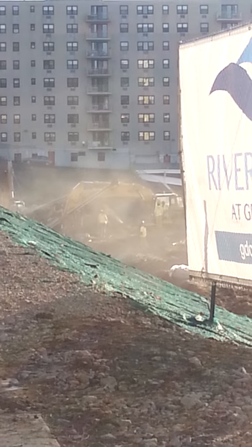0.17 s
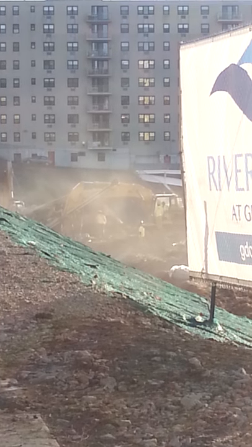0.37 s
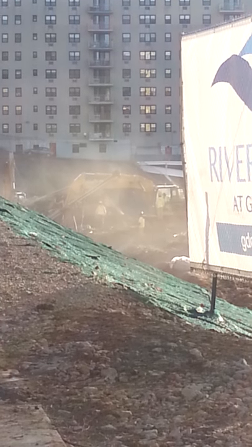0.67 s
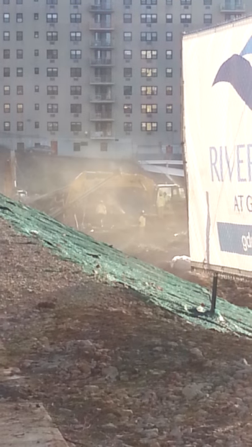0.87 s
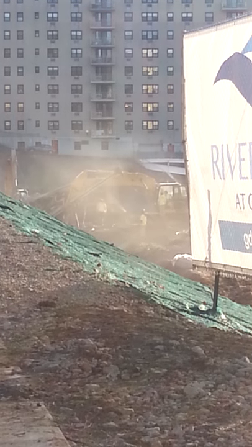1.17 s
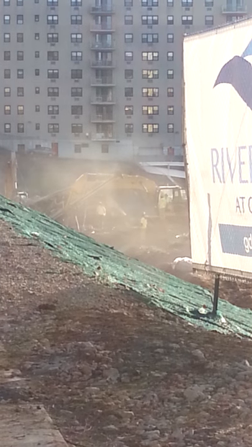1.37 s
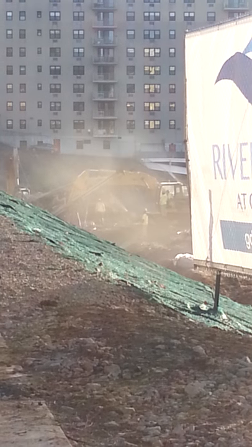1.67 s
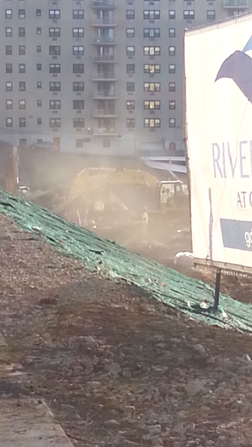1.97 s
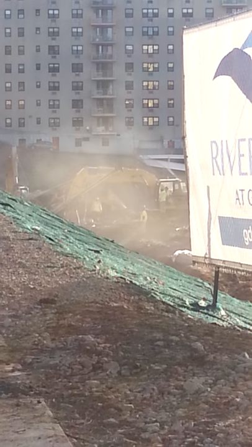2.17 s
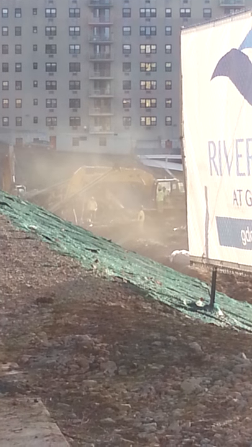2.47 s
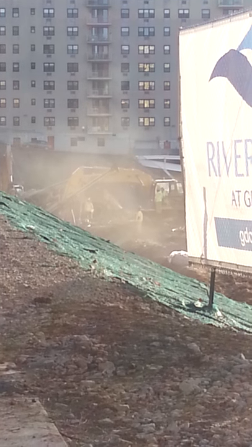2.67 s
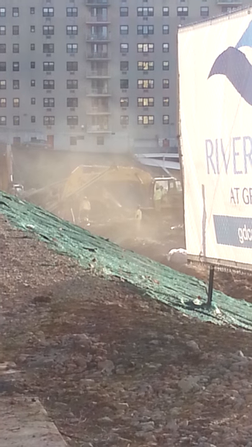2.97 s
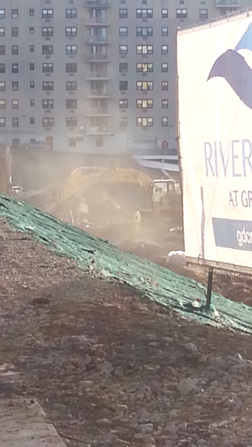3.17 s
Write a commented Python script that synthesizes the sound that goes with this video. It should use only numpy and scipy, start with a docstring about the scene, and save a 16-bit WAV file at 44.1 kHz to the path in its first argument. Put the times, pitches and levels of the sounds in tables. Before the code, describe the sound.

Steady engine drone and broad far roar on an open building site; a tiny tick and grit puff precede a clattering metallic burst with booming echo, then machinery continues with a brief steel squeal, miked from afar.

```python
"""A steel attachment hammers a short, slowing burst that booms back off a tall facade on a building site,
heard from across open ground. Each contact rings steel modes, scrapes up grit noise and thuds; a puff of grit
and a bright tick come first. Hydraulic pumps whine and steel squeals briefly, as drifting sines. Diesel engines
drone as wavering multiples of their shaft rates, over a broad far roar of coloured noise and microphone hiss."""
import sys
import numpy as np
from scipy import signal
from scipy.fft import rfft, irfft, next_fast_len
from scipy.io import wavfile
from scipy.ndimage import map_coordinates

SR = 44100
rng = np.random.default_rng(int(sys.argv[2]) if len(sys.argv) > 2 else 0)


def elevation(decibels):
    """Turn decibel levels (scalar or array-like) into linear amplitude ratios."""
    levels = np.asarray(decibels, float)
    return 10 ** (levels / 20)


def put_to_file(sound):
    """Save the sound as 16-bit audio at rate SR, in the file named by the first command-line argument."""
    columns = np.atleast_2d(sound).T  # one column per channel
    safe = np.clip(columns, -1, 1)
    whole_steps = np.round(safe * 32767)
    wavfile.write(sys.argv[1], SR, whole_steps.astype(np.int16))


N = 145971
T = np.arange(N) / SR  # s


def unit(x):
    """Scaled to rms 1."""
    return x / np.sqrt(np.mean(x ** 2) + 1e-20)


def along(points, hz):
    """(Hz, value) points read on a log frequency axis."""
    f, v = np.transpose(points)
    return np.interp(np.log(hz + 1), np.log(f + 1), v)


def curves(rows):
    """One value per sample for each column after the time."""
    s, *cols = np.transpose(rows)
    return [np.interp(T, s, c) for c in cols]


def wobble(rate):
    """A smooth random curve, rate knots a second."""
    return map_coordinates(rng.standard_normal(400), [np.clip(T * rate, 0, 390)])


def noise(spectrum):
    """Random noise of rms 1, coloured by (Hz, dB) points."""
    m = next_fast_len(N + 8192)
    gain = elevation(along(spectrum, np.fft.rfftfreq(m, 1 / SR)))
    coloured = irfft(rfft(rng.standard_normal(m)) * gain, m)
    return unit(coloured[:N])


def tones(hz, orders, flutter_db, drift_rad):
    """Multiples of one shaft rate, each wavering in level and phase."""
    turn = 2 * np.pi * np.cumsum(hz + 0 * T) / SR
    total = 0
    for multiple, db in orders:
        level = elevation(db + flutter_db * wobble(8.71))
        phase = 2 * np.pi * rng.random() + drift_rad * wobble(7)
        total = total + level * np.sin(multiple * turn + phase)
    return np.sqrt(2) * total  # a sine of rms 1 at 0 dB


def burst(start, db, t60):
    """A sudden envelope that dies away by 60 dB in t60 seconds."""
    attack = np.clip((T - start) / .0002, 0, 1)
    return elevation(db - 60 * np.abs(T - start) / t60) * attack


def hammer():
    """Each scraping contact swells and rings the steel modes near its centre; returns the ring and the force."""
    # hammer contacts: (peak time [s], level [dB], centre of the ring [Hz], spread of the contact [s])
    blows = [(1.407, -19, 3248, 0.0032), (1.417, -6.5, 3020, 0.0056), (1.433, -18.5, 3150, 0.0039),
             (1.46, -12, 2580, 0.0041), (1.466, -10.5, 2700, 0.002), (1.509, -21, 2500, 0.0029),
             (1.52, -7.5, 2920, 0.0029), (1.53, -16, 3187, 0.0021), (1.561, -33, 2900, .003),
             (1.578, -14.5, 2480, 0.0042), (1.583, -11.5, 3050, 0.0056), (1.602, -23.5, 3570, .003),
             (1.614, -20, 3200, 0.0036), (1.632, -24.5, 2780, 0.0061), (1.661, -12, 3000, 0.0037),
             (1.72, -13, 3150, 0.0032), (1.782, -18.5, 2520, 0.0038), (1.79, -17, 3270, 0.0066),
             (1.812, -32, 2500, .003), (1.892, -24, 3157, 0.0062)]
    # modes of the struck steel: (frequency [Hz], level [dB])
    steel_modes = [(2080, -17), (2260, 3.5), (2450, 4.5), (2580, 9.5), (2845, 5.5), (2895, 2.5),
                   (3110, 4.5), (3200, 4.5), (3270, 6), (3500, 1.5), (3670, 6.5), (3895, -2.5), (4150, 0.5),
                   (4320, -5.5), (4780, -19), (5400, -15)]
    phase_memory_s = .02
    ring_width_oct, ring_scatter_db, ring_floor_db = .17, 1.5, -12.5
    ring_t60_s, ring_tail = 0.039, 0.27  # tail as a share of the push
    steel, force = np.zeros(N), np.zeros(N)
    t = np.arange(-SR // 20, SR // 8) / SR
    hz, level = np.transpose(steel_modes)
    phase = 2 * np.pi * rng.random((len(hz), 1))
    last = blows[0][0]
    for s, db, centre, spread in blows:
        # the longer the gap, the further the mode phases stray
        phase = phase + (s - last) / phase_memory_s * rng.standard_normal(phase.shape)
        last = s
        push = np.exp(-.5 * (t / spread) ** 2)
        tail = (t > 0) * ring_tail * elevation(-60 * np.abs(t) / ring_t60_s)
        near = np.maximum(-6 * (np.log2(hz / centre) / ring_width_oct) ** 2, ring_floor_db)
        gain = elevation(level + near + ring_scatter_db * rng.standard_normal(len(hz)))
        ring = unit(gain @ np.sin(2 * np.pi * hz[:, None] * (t + s) + phase))
        at = round((s + t[0]) * SR)
        steel[at:at + len(t)] += elevation(db) * np.maximum(push, tail) * ring / 2
        force[at:at + len(t)] += elevation(db) * push
    return steel, force


def grit(force):
    """Grinding noise that follows the contact force."""
    colour = [(1200, -42), (2000, 4.5), (3200, 9.5), (5000, -13), (7000, -16.5), (8300, -62)]
    return elevation(-13) * force * noise(colour)


def thud(force):
    """Each blow shakes the machine body and the ground, whose noise dies away exponentially."""
    # colour of body and ground: (frequency [Hz], level [dB per Hz])
    thud_colour = [(60, -31), (110, 2.5), (250, -2.5), (600, -5.5), (1200, -9.5), (2000, -9), (5000, -16.5),
                   (9000, -104.5)]
    t60_s = 0.38
    ringing = np.exp(-np.log(1000) * T[:SR] / t60_s)
    power = signal.fftconvolve(force ** 2, ringing ** 2 / np.sum(ringing ** 2))[:N]
    return elevation(-8.5) * np.sqrt(np.abs(power)) * noise(thud_colour)


def facade(x):
    """The buildings answer after 500 samples; each frequency dies at its own speed."""
    # reverberation: (frequency [Hz], 60 dB decay time [s])
    decay_times = [(200, 0.91), (2500, 0.63), (8000, 0.52)]
    hz, t, z = signal.stft(rng.standard_normal(SR), SR, nperseg=256)
    fade = elevation(-60 * t / along(decay_times, hz)[:, None])
    tail = signal.istft(z * fade, SR, nperseg=256)[1]
    echo = signal.fftconvolve(np.pad(x, (500, 0)), tail / np.linalg.norm(tail))[:N]
    return elevation(-8) * echo


def puff():
    """A puff of grit just before the hammering: a sudden burst of coloured noise."""
    # colour of the grit: (frequency [Hz], level [dB per Hz])
    puff_colour = [(1500, -42), (3200, 8.5), (5000, -1), (9000, -20), (12000, -66)]
    return burst(1.344, db=-31.5, t60=.2) * noise(puff_colour)


def tick():
    """A tiny bright tick close to the microphone: a very short burst of treble noise."""
    # colour of the tick: (frequency [Hz], level [dB per Hz])
    tick_colour = [(3500, -30), (5000, -2), (9000, -6), (13500, 0), (14800, -3), (15500, -80)]
    return burst(1.2125, db=-32, t60=.008) * noise(tick_colour)


def pumps():
    """Two hydraulic pumps whine at multiples of their piston rates; the second takes load and sags."""
    # first pump: (time [s], piston rate [Hz], level [dB])
    pump_course = [(0, 363.6, -46.5), (.3, 362.5, -45), (.45, 362.5, -35.5), (.6, 362.5, -40),
                   (.8, 361.5, -40), (.9, 362.4, -42), (1.02, 361.2, -38.5), (1.3, 359, -47.5),
                   (1.6, 363, -48), (1.9, 361.7, -45.5), (2.3, 363, -47), (2.55, 364, -43),
                   (2.75, 365.4, -61), (2.95, 363.5, -47.5), (3.31, 364, -40)]
    # its overtones: (multiple of the piston rate, relative level [dB])
    pump_orders = [(1, -4), (2, -2), (3, -6), (4, 0), (5, -9), (10, -9)]
    # second pump: (time [s], piston rate [Hz], level [dB])
    sag_course = [(.42, 360.2, -67), (.5, 362, -35), (.62, 358, -37.5), (.75, 359, -41.5), (.88, 349, -41),
                  (1.0, 349, -70)]
    # its overtones: (multiple of the piston rate, relative level [dB])
    sag_orders = [(2, -1), (3, -4), (4, 0), (10, -12), (11, -10)]
    whine = 0
    for rows, orders in ((pump_course, pump_orders), (sag_course, sag_orders)):
        hz, level_db = curves(rows)
        whine = whine + elevation(level_db) * tones(hz, orders, flutter_db=1.2, drift_rad=.3)
    return whine


def squeal():
    """A short squeal of steel: one unsteady tone that swells and fades."""
    start_s, length_s = 2.57, .25
    progress = np.clip((T - start_s) / length_s, 0, 1)
    swell = np.sqrt(np.abs(np.sin(np.pi * progress)))
    return swell * tones(1695, [(1, -41)], flutter_db=2.5, drift_rad=1.2)


def first_engine():
    """A diesel drone of multiples of the camshaft rate."""
    # orders: (multiple of the camshaft rate, level [dB rms])
    cam_orders = [(4, -50.5), (5, -38.5), (6, -36.5), (7, -49), (8, -40), (11, -41.5)]
    cam_hz = 26.5
    return tones(cam_hz, cam_orders, flutter_db=1.5, drift_rad=.25)


def second_engine():
    """A firing tone that surges and sinks, with overtones that hold their level on average."""
    # firing tone: (time [s], level [dB rms])
    firing_level = [(0, -30), (.22, -45), (.4, -27.5), (.5, -39), (.6, -30), (.75, -37.5), (1.0, -29.5),
                    (1.15, -34), (1.3, -43), (1.43, -30.5), (1.56, -24), (1.66, -37), (1.8, -41.5),
                    (1.95, -27), (2.15, -39.5), (2.3, -38), (2.42, -31), (2.56, -35), (2.8, -28.5),
                    (3.0, -29), (3.18, -34), (3.31, -33)]
    # overtones: (multiple of the firing rate, level [dB rms])
    firing_orders = [(2, -42.5), (3, -43.5)]
    firing_hz = 244
    level_db, = curves(firing_level)
    firing = elevation(level_db) * tones(firing_hz, [(1, 0)], flutter_db=.5, drift_rad=.2)
    return firing + tones(firing_hz, firing_orders, flutter_db=2.5, drift_rad=.3)


def farther_machines():
    """Tones of machines farther off, each wavering by itself around a fixed pitch."""
    # tones: (frequency [Hz], level [dB rms])
    idle_tones = [(52, -58), (66, -45), (86, -45), (605, -46), (640, -47), (1697, -50), (3025, -54),
                  (4200, -60)]
    return sum(tones(hz, [(1, db)], flutter_db=3, drift_rad=.8) for hz, db in idle_tones)


def roar():
    """Fans, exhausts and traffic merge far off into broad, slightly unsteady noise."""
    # colour: (frequency [Hz], level [dB per Hz])
    roar_colour = [(21, -59), (35, -50), (54, -42.5), (101, -9), (118, -10), (181, -8), (246, -5.5),
                   (316, -7.5), (711, -9.5), (880, -11), (1000, -8), (1150, -10), (1410, -13),
                   (1700, -12.5), (2100, -16), (3050, -17.5), (3600, -19.5), (5000, -28.5), (7500, -43.5),
                   (9000, -66), (12000, -83)]
    # course: (time [s], level [dB rms])
    roar_level = [(0.0, -27), (0.55, -27), (1.23, -28), (1.65, -25.5), (1.82, -27), (2.9, -27.5),
                  (3.31, -27)]
    level_db, = curves(roar_level)
    return elevation(level_db + .6 * wobble(14)) * noise(roar_colour)


def hiss():
    """Faint steady treble noise of the microphone."""
    # colour: (frequency [Hz], level [dB per Hz])
    hiss_colour = [(5000, -40), (7500, 0), (10000, -5), (15000, -10), (16000, -60)]
    return elevation(-64) * noise(hiss_colour)


def scene():
    """All sources at one microphone."""
    steel, force = hammer()
    steel = steel + grit(force)
    blows = steel + facade(steel) + thud(force)
    machines = pumps() + squeal() + first_engine() + second_engine() + farther_machines()
    return (blows + puff() + tick() + machines + roar())[None]


def low_pass(x):
    """Removes everything above the highest recorded frequency."""
    return signal.sosfilt(signal.butter(12, 14950, fs=SR, output="sos"), x)


def record(dry):
    """The microphone adds its hiss to the scene."""
    mix = dry + hiss()
    return low_pass(mix)


dry = scene()
out = record(dry)
put_to_file(out)
```